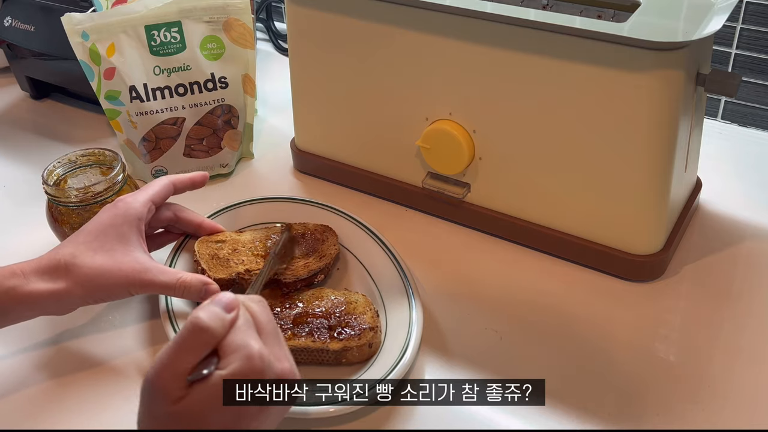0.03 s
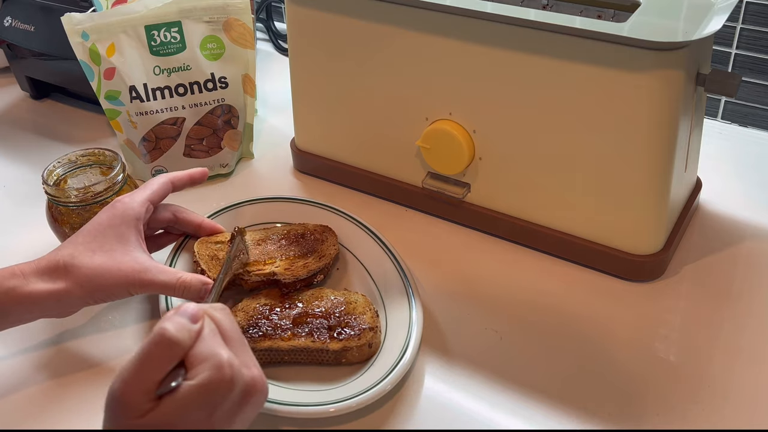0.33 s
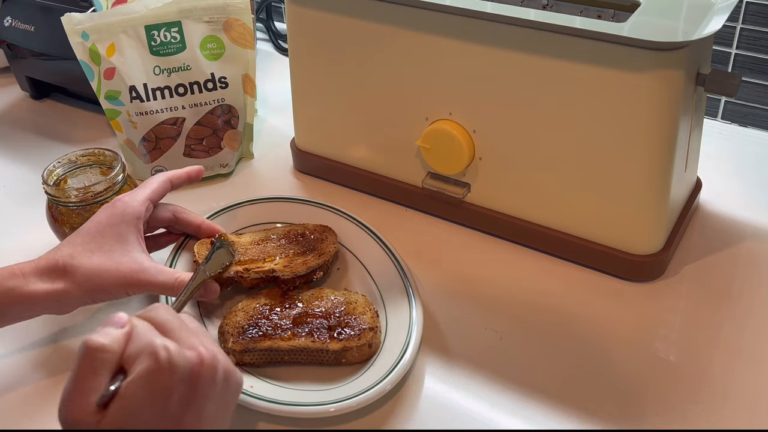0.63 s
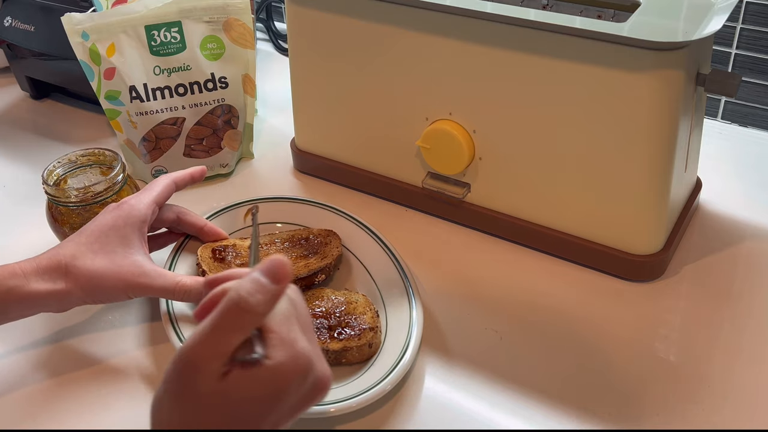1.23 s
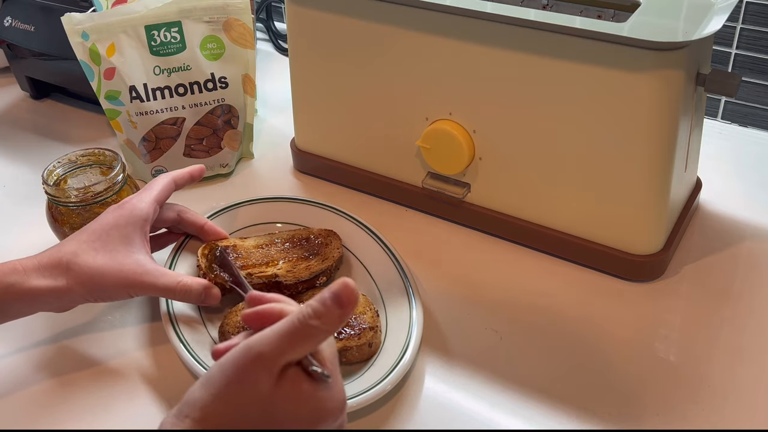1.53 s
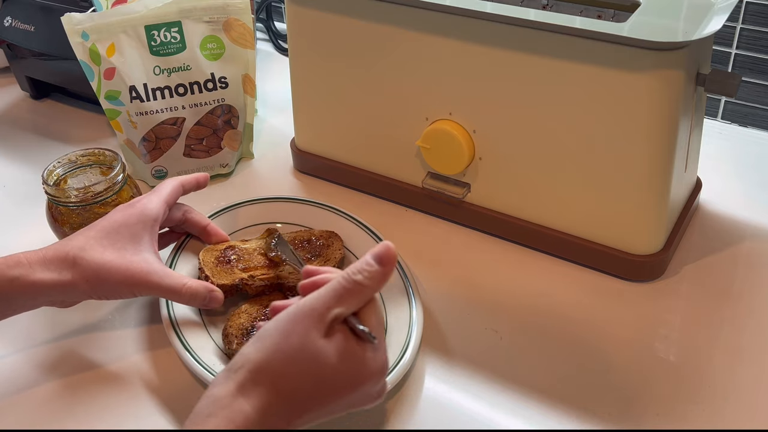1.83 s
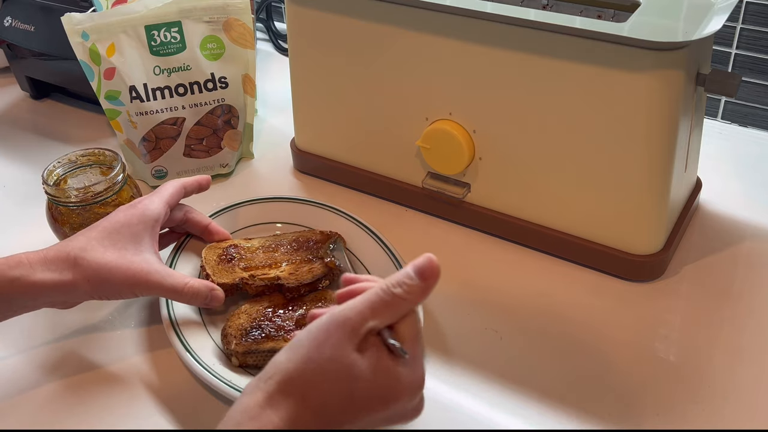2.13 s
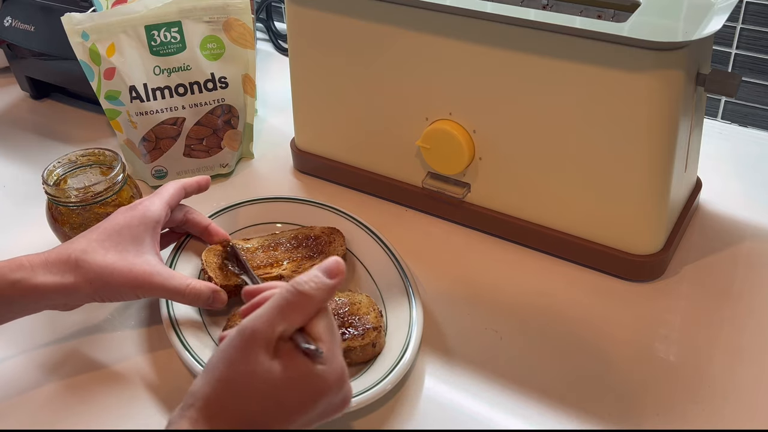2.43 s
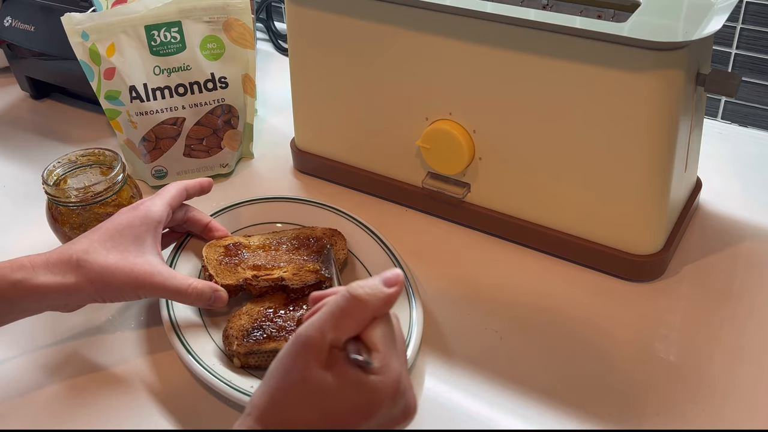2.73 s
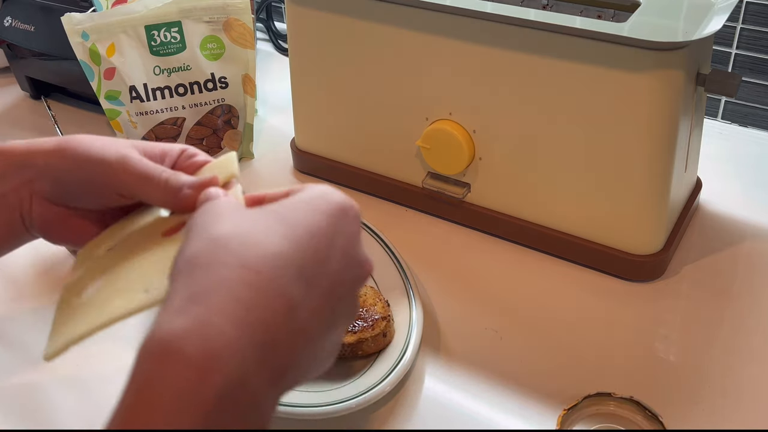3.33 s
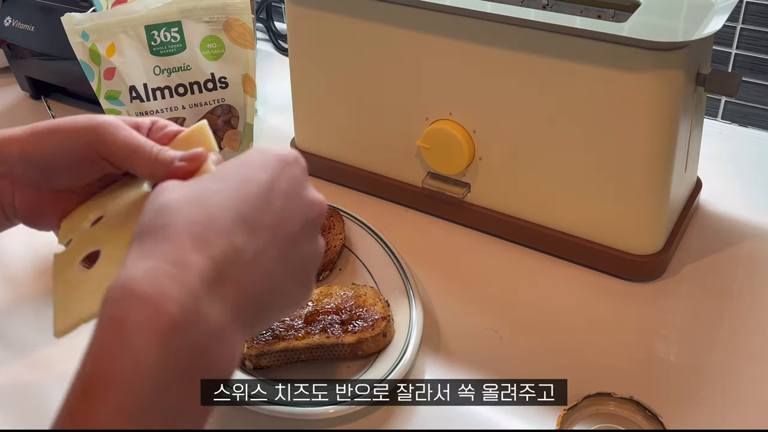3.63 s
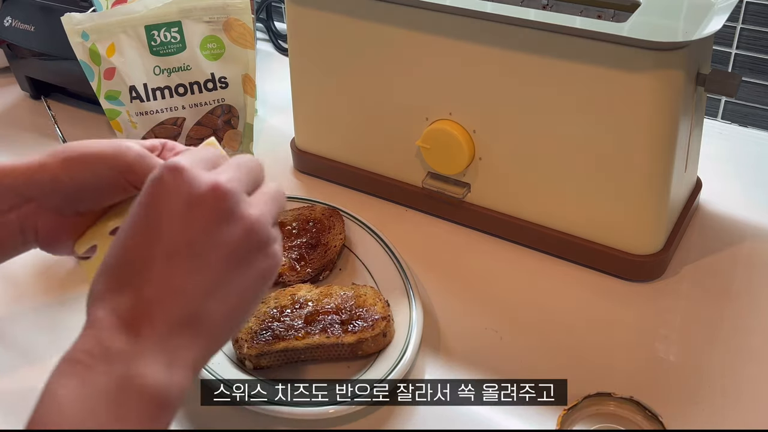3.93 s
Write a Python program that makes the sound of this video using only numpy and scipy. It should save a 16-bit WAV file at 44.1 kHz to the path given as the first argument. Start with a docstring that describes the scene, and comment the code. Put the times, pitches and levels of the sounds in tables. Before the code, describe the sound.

A knife scrapes crisp toast close by, in short dry strokes for the first half second. Faint sticky ticks and a slight plate clink follow around 0.8 seconds. Crackly scraping resumes at 1.5 seconds and is loudest from 2.5 to 2.7, with soft dull thuds on the counter. A few last ticks end by 3.3 seconds, and the quiet kitchen hum gains a low drone.

```python
"""Spreading jam on toast

A table knife works over crisp toast on a plate, close by in a small kitchen. Each stroke fractures a dense,
uneven run of crumbs; the blade clacks and sticky jam pops. The plate rings once and pressure sends dull thuds
into the counter. Counter and walls reflect the small sounds, over air noise, a rumble and the hum of an
appliance. A low drone enters near the end."""
import sys
import numpy as np
from scipy import signal
from scipy.fft import rfft, irfft, next_fast_len
from scipy.io import wavfile
from scipy.ndimage import map_coordinates

SR = 44100
rng = np.random.default_rng(int(sys.argv[2]) if len(sys.argv) > 2 else 0)


def generate_wav(sig):
    """Save sig (samples, or channels by samples) to the path in sys.argv[1] as 16-bit PCM at SR."""
    pcm = np.round(np.clip(np.atleast_2d(sig).T, -1, 1) * 32767).astype(np.int16)
    wavfile.write(sys.argv[1], SR, pcm)


N = 176400

# Spectrum of the blade sliding on toast: f/Hz, relative level/dB
TOAST_SPECTRUM = [(120, -11), (270, -9.5), (370, -4), (480, 2), (700, -4.5), (1050, 1.5), (1400, -1),
                  (2000, -3), (2450, -6.5), (3000, -3.5), (3650, -6), (4300, -7), (5050, -3.5),
                  (5450, -8.5), (6000, -6.5), (6750, -3.5), (7600, -13.5), (8500, -7.5), (9300, -12),
                  (10200, -9), (11800, -12.5), (13300, -2.5), (14400, -14), (15700, -8)]
SQUEAK_HZ, SQUEAK_Q = 13330, 28  # narrow resonance of the blade


def knife_strokes():
    """Stick-slip friction: the blade catches and slips, fracturing crumbs of unequal size in clumps."""
    # t/s, duration/s, levels/dB of body, rasp and crispness, swell over the stroke/dB,
    # f/Hz of the slice's hollow, gains/dB of the blade's ring and squeak
    strokes = [ (0.0, 0.025, -51.5, -44.5, -50, -10, 530, 3, 1),
               (0.04, 0.12, -52.5, -50, -49.5, 3.5, 474, 8, -1),
               (0.189, 0.078, -53, -48.5, -46.5, 1, 516, 5, 2),
               (.297, .033, -47, -45.5, -44.5, -18, 1010, 0, 1),
               (0.447, 0.043, -55, -52, -50, 0, 527, 6, 5),
               (0.512, 0.011, -56.5, -55.5, -53, -4, 523, -2, 7),
               (0.766, 0.046, -94, -70, -67, 3, 790, 2, -9), (0.982, 0.071, -74, -81, -79, 4, 970, 6, -5),
               (1.114, 0.017, -81, -76.5, -76, -2, 1000, 6, -1),
               (1.582, 0.017, -72, -56, -56, 0, 1110, 2, 3),
               (1.615, 0.041, -59.5, -51, -47, -1.5, 1080, -2, 8),
               (1.766, 0.052, -72.5, -71, -70, -3, 500, -18, -1),
               (1.8, 0.056, -60.5, -66, -73, -8, 467, -6, -3),
               (1.915, 0.051, -53, -55.5, -59, 2.5, 580, 0, 1),
               (1.975, 0.058, -49.5, -56, -50.5, -1.5, 615, 0, -22),
               (2.067, 0.04, -53.5, -59, -55.5, 6.5, 660, 3, 1),
               (2.439, 0.011, -57, -54.5, -65.5, 3, 1060, 0, -1),
               (2.535, 0.039, -42.5, -44, -39.5, 6, 890, 3, -18),
               (2.553, 0.024, -45, -46.5, -55, 2.5, 390, -3, 0),
               (2.585, 0.054, -43, -42, -40.5, -1.5, 1000, 3.5, -10),
               (2.65, .036, -42, -48, -45, -4.5, 1130, -4, -6),
               (2.689, 0.039, -47, -47.5, -52, 7, 1080, -2, 7)]
    crumbs_per_s, spread_db, slide_share = 4500, 7.5, 0.43
    catches_per_s, catch_db = 130, 3.2
    attack_s, release_s = 0.0022, 0.008
    out, t = np.zeros((2, N)), np.arange(SR // 4) / SR
    for start, length, body, rasp, crisp, swell_db, hollow_hz, blade_db, squeak_db in strokes:
        crumbs = (rng.random(len(t)) < crumbs_per_s / SR) * rng.choice([-1, 1], len(t))
        sizes = amp(spread_db * np.clip(rng.standard_normal(len(t)), -2, 2))
        grit = unit(crumbs * sizes) + slide_share * rng.standard_normal(len(t))
        grit *= amp(catch_db * wobble(catches_per_s, len(t)))
        grit /= np.sqrt(np.mean(grit[t < length] ** 2))
        pressure = (1 - np.exp(-t / attack_s)) * np.exp(-np.maximum(t - length, 0) / release_s)
        pressure *= amp(swell_db * (np.minimum(t / length, 1) - .5))
        resonances = [(hollow_hz, 1.67, 7), (3050, 4.5, blade_db), (SQUEAK_HZ, SQUEAK_Q, squeak_db)]
        ring = crust_response(TOAST_SPECTRUM, [body, rasp, crisp], resonances)
        add(out, start, kitchen(signal.fftconvolve(grit * pressure, ring)))
    return out


def crust_response(spectrum, levels_db, resonances, size=2048):
    """Minimum-phase impulse response of toast: three bands, shaped by resonances (f/Hz, Q, gain/dB)."""
    body_top_hz, rasp_top_hz = 1900, 9470
    hz = np.fft.rfftfreq(size, 1 / SR)
    colour = amp(along(spectrum, hz)) * np.prod([peak(hz, *r) for r in resonances], axis=0)
    low = 1 / (1 + (hz / body_top_hz) ** 6)
    mid = 1 / (1 + (hz / rasp_top_hz) ** 8)
    bands = [low, mid * (1 - low), (1 - mid) * (1 - low)]  # body, rasp, crispness
    power = sum((amp(db) * unit(colour * np.sqrt(band))) ** 2 for db, band in zip(levels_db, bands))
    cepstrum = irfft(np.log(power + 1e-14) / 2)
    cepstrum[1:size // 2] *= 2  # folding onto positive time makes the ring causal
    cepstrum[size // 2 + 1:] = 0
    return irfft(np.exp(rfft(cepstrum)))


def blade_clacks():
    """Impact: the blade clacks against the toast, and the short burst rings with the blade's own colour."""
    # t/s, relative levels/dB of body, rasp and crispness, f/Hz of the ring
    ticks = [ (.0445, -51, -47, -37.5, 2920), (0.103, -42, -40, -42, 3000), (.1905, -58, -37, -35, 3200),
             (0.222, -46, -37, -44, 3200), (.7389, -97, -65, -62, 4500), (0.7832, -75, -47, -40, 10800),
             (1.0422, -70, -60.5, -58, 4500), (1.549, -36.5, -35, -42.5, 4270),
             (1.802, -73, -49, -43, 4500), (1.88, -43.5, -57.5, -58, 2210), (1.938, -57, -45.5, -42, 5000),
             (1.985, -46, -46, -36, 7040), (2.0027, -41, -43, -42, 7140), (2.025, -48, -48, -44, 1100),
             (2.112, -56, -41, -36, 8250), (2.257, -55.5, -66, -52.5, 5000),
             (2.3719, -43, -39.5, -52, 5200), (2.4514, -65, -44, -36, 7060), (2.5731, -50, -52, -41, 3230),
             (2.721, -52, -45, -37, 6440), (3.153, -55.5, -57.5, -56, 2300), (3.2026, -60, -67, -60, 4900),
             (3.2983, -45, -58.5, -90, 3770)]
    # Spectrum of one snap: f/Hz, relative level/dB
    snap_spectrum = [(120, 0.5), (450, -12), (1000, 4.5), (1400, -2.5), (1950, 4), (2500, -3.5),
                     (3050, -7.5), (3500, -1), (4800, -3), (5300, -9), (5850, -5), (7300, -7.5),
                     (8500, -11.5), (13000, -9.5), (15500, -8)]
    rise_s, fall_s = 0.00067, 0.0013
    out, t = np.zeros((2, N)), np.arange(SR // 40) / SR
    envelope = amp(-0.5) * np.minimum(t / rise_s, 1) * np.exp(-np.maximum(t - rise_s, 0) / fall_s)
    for start, body, rasp, crisp, ring_hz in ticks:
        snap = rng.standard_normal(len(t)) * envelope
        ring = crust_response(snap_spectrum, [body, rasp, crisp], [(ring_hz, 3, 5)])
        add(out, start, kitchen(signal.fftconvolve(snap, ring)))
    return out


def jam_pops():
    """Adhesive failure: jam lets go of the blade in tiny scattered impulses that excite the toast."""
    # Spells of clinging: start t/s, end t/s, relative level/dB
    spells = [(0.544, 1.193, -61), (1.675, 2.253, -52), (3.038, 3.226, -67)]
    pops_per_s, spread_db = 72, 3
    ring = crust_response(TOAST_SPECTRUM, levels_db=(-4.5, -14, 0), resonances=[(SQUEAK_HZ, SQUEAK_Q, 3)])
    out = np.zeros((2, N))
    for start, end, db in spells:
        pops = np.zeros(int((end - start) * SR))
        when, chance = rng.random((100, 2))[:int(pops_per_s * (end - start))].T
        excess_db = spread_db * np.minimum(-np.log(chance), 3)
        pops[(when * len(pops)).astype(int)] = amp(db + excess_db)
        add(out, start, kitchen(signal.fftconvolve(pops, ring)))
    return out


def plate_knock():
    """Free vibration: nudged with a short scuff, the loaded plate rings in its damped modes."""
    # t/s, relative level/dB
    knocks = [(.806, -61)]
    # Modes of the plate: f/Hz, relative level/dB, T60/s
    modes = [(745, 3.5, 0.093), (825, 9, 0.033), (1313, -3.5, 0.17), (1700, -8, 0.037), (2300, -7, 0.13),
             (2870, 1, 0.047), (3970, -4, 0.087), (4770, -11.5, .08)]
    scuff_s, scuff_top_hz = 0.01, 4500
    out, t = np.zeros((2, N)), np.arange(SR // 4) / SR
    ring = sum(amp(db) * decay(t, t60) * np.sin(2 * np.pi * hz * t) for hz, db, t60 in modes)
    for start, db in knocks:
        burst = rng.standard_normal(len(t)) * np.exp(-t / scuff_s)
        scuff = filtered(burst, lambda hz: 1 / (1 + (hz / scuff_top_hz) ** 4))
        add(out, start, kitchen(amp(db) * (ring + 2 * scuff)))
    return out


def counter_thuds():
    """Structure-borne sound: pressure through the plate sets off a damped oscillation of the counter."""
    # t/s, f/Hz, level/dB
    thuds = [(0.019, 187, -53), (0.272, 121, -43), (0.332, 81, -74), (1.988, 101.5, -41.5),
             (2.611, 118, -46.5), (2.668, 88, -40), (2.73, 77.5, -42)]
    rise_s = 0.0052
    out, t = np.zeros((2, N)), np.arange(SR // 2) / SR
    envelope = (1 - np.exp(-t / rise_s)) * decay(t, t60=0.14)
    for start, hz, db in thuds:
        add(out, start, amp(db) * np.sin(2 * np.pi * hz * t) * envelope)
    return out


def kitchen(x, reflections=8):
    """Superposition at two microphones: direct sound, early reflections and a diffuse, decaying tail."""
    # f/Hz, phase lead of left over right/rad
    phase_lead = [(20, 16), (300, -1.57), (1050, 2.11), (1900, 1.27), (3000, 1.72), (4500, 1.62),
                  (6500, 1.7), (7300, -0.07), (8000, 5.5), (10700, 3.5), (12400, -0.34), (13300, -26.5),
                  (14200, -21.5), (16000, -3.5)]
    # Reverberation time: f/Hz, T60/s
    room_t60 = [(100, 0.13), (500, 0.36), (2000, 0.64), (6500, 0.46), (10000, 0.3), (16000, 0.23)]
    # Spectrum of the tail: f/Hz, level/dB
    tail_spectrum = [(100, -18), (600, -4), (2000, -4), (5500, -5), (6800, -3), (8000, -4), (11000, -9.5),
                     (16000, -23)]
    # f/Hz, level of left over right/dB
    balance = [(100, -2), (450, 1.5), (700, -0.5), (1100, 3), (2500, 1), (4500, 4), (6700, 3.5), (8500, -2),
               (16000, 0.5)]
    early_db, early_s = -5, 0.009
    padded = np.pad(x, (0, SR // 2))
    direct = filtered(padded, lambda hz: np.exp(.5j * along(phase_lead, hz) * [[1], [-1]]))
    early = np.zeros((2, SR // 10))
    for side in early:
        signs = rng.choice([-1, 1], reflections)
        delays = early_s * rng.uniform(.1, 1, reflections)
        side[(SR * delays).astype(int)] = signs / np.sqrt(reflections)
    hz, t, noise = signal.stft(rng.standard_normal((2, SR // 2)), SR, nperseg=256)
    t60 = along(room_t60, hz)[:, None]
    envelope = decay(t, t60) * np.sqrt(2 * np.log(1000) / (t60 * SR))  # unit energy at each frequency
    tail = signal.istft(noise * envelope * amp(along(tail_spectrum, hz))[:, None], SR, nperseg=256)[1]
    response = np.pad(tail, ((0, 0), (SR // 200, 0)))  # the tail arrives 5 ms late
    response[:, :early.shape[1]] += amp(early_db) * early
    reflected = signal.fftconvolve(x[None], response, axes=1)[:, :len(padded)]
    return filtered(direct + reflected, lambda hz: amp(along(balance, hz) * [[.5], [-.5]]))


def room_tone():
    """Noise floor: broadband air noise, a low rumble and an appliance's hum, wavering in phase."""
    # Spectra of air noise and rumble: f/Hz, relative level/dB
    air_spectrum = [(40, -14.5), (150, 1), (310, -6), (600, -8), (750, -14), (1150, -15), (1500, -21.5),
                    (2500, -37.5), (3800, -35), (4800, -33.5), (6500, -39.5), (9500, -42), (11000, -49),
                    (13700, -48), (15500, -66)]
    rumble_spectrum = [(20, -20), (33, 3.5), (50, 11.5), (68, 19), (85, 10.5), (102, 0), (120, -2),
                       (140, -20), (250, -54), (1000, -100)]
    # f/Hz, left-right coherence
    air_coherence = [(100, .9), (300, 0.4), (700, 0.1), (2000, 0.084), (10000, 0.033)]
    # Slow drift of the rumble: t/s, relative level/dB
    rumble_drift = [(0, -55.5), (.8, -59), (1.5, -59.5), (2.2, -56.5), (3.0, -59), (4, -54.5)]
    # Partials of the hum: f/Hz, level/dB
    partials = [(71, -69), (113, -66), (162, -75.5), (339, -83), (4764, -96)]
    t = np.arange(N) / SR
    rumble_db = np.interp(t, *np.transpose(rumble_drift)) - 1.5
    rumble = amp(rumble_db) * stereo_noise(rumble_spectrum, coherence=[(60, 0.96)])
    hum = sum(amp(db) * unit(np.sin(2 * np.pi * hz * t + 0.75 * wobble(6, N))) for hz, db in partials)
    air = amp(-61) * stereo_noise(air_spectrum, air_coherence)
    return air + (rumble + hum) * amp([[-.9], [.9]])


def drone():
    """Narrow-band noise, heard as a low drone, swells and holds a little to the right."""
    # f/Hz, relative level/dB
    spectrum = [(40, -37), (58, -10), (72, 3), (88, -4), (104, 4.5), (118, 2.5), (140, -28), (330, -14.5),
                (700, -55), (2000, -100)]
    start_s, rise_s = 3.36, 0.22
    swell = np.clip((np.arange(N) / SR - start_s) / rise_s, 0, 1)
    return amp(-55) * swell * stereo_noise(spectrum, coherence=[(60, 0.94)]) * amp([[-1.1], [1.1]])


def stereo_noise(spectrum, coherence):
    """Partially coherent noise of rms 1: the ratio of mid to side sets how alike the channels are."""
    def response(hz):
        angle = np.arccos(np.clip(along(coherence, hz), -1, 1)) / 2
        return amp(along(spectrum, hz)) * [np.cos(angle), np.sin(angle)]
    mid, side = filtered(rng.standard_normal((2, N)), response)
    return unit(np.array([mid + side, mid - side]))


def peak(hz, centre_hz, q, db):
    """Gain of a resonance that stands db above its surroundings."""
    return amp(db / (1 + (2 * q * (hz - centre_hz) / centre_hz) ** 2))


def decay(t, t60):
    """Exponential damping by 60 dB in t60 seconds."""
    return np.exp(-np.log(1000) * t / t60)


def amp(db):
    """Amplitude ratio of a level in decibels."""
    return 10 ** (np.asarray(db) / 20)


def unit(x):
    """Normalisation to rms 1."""
    return x / np.sqrt(np.mean(x ** 2) + 1e-20)


def along(points, hz):
    """Interpolation of (f/Hz, value) points on a logarithmic frequency axis."""
    f, values = np.transpose(points)
    return np.interp(np.log(hz + 1), np.log(f + 1), values)


def wobble(rate, n):
    """Smooth random modulation with rate knots a second."""
    return map_coordinates(rng.standard_normal(2048), [np.arange(n) * rate / SR], mode="wrap")


def filtered(x, response):
    """Linear filtering: the spectrum of x times a complex frequency response."""
    n = x.shape[-1]
    size = next_fast_len(n + 8192)
    return irfft(rfft(x, size) * response(np.fft.rfftfreq(size, 1 / SR)), size)[..., :n]


def add(track, start_s, x):
    """Superposition of x on the track from start_s."""
    i = max(0, round(start_s * SR))
    track[:, i:i + x.shape[-1]] += x[..., :N - i]


def scene():
    """Sound pressures add: knife, toast and plate over the background of the room."""
    contacts = knife_strokes() + blade_clacks() + jam_pops() + plate_knock() + counter_thuds()
    return contacts + room_tone() + drone()


def record(dry):
    """Band limiting: a steep low-pass removes the highest treble."""
    cutoff_hz = 15880
    return filtered(dry, lambda hz: 1 / (1 + (hz / cutoff_hz) ** 150))


dry = scene()
out = record(dry)
generate_wav(out)
```